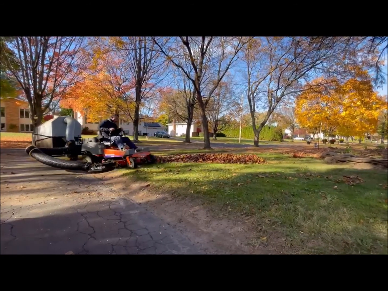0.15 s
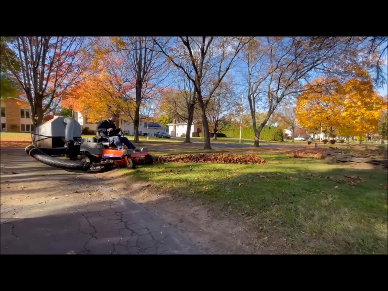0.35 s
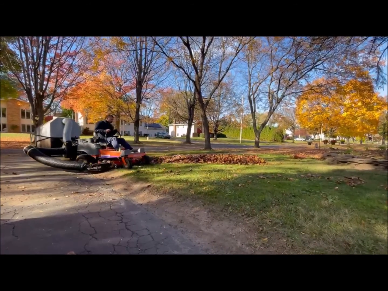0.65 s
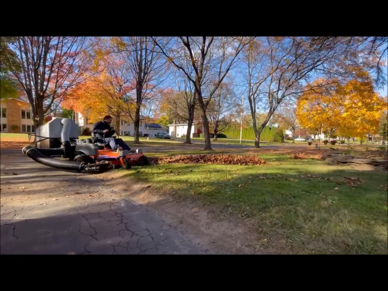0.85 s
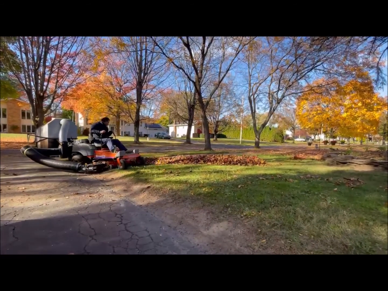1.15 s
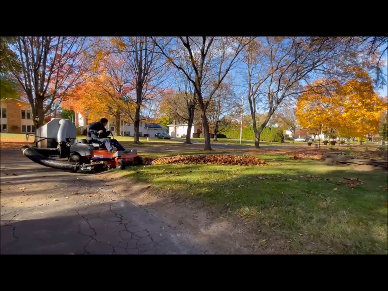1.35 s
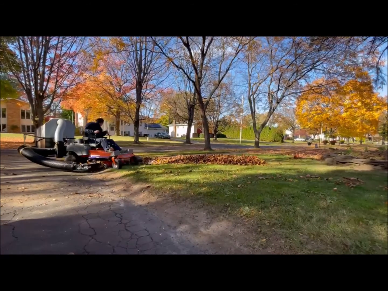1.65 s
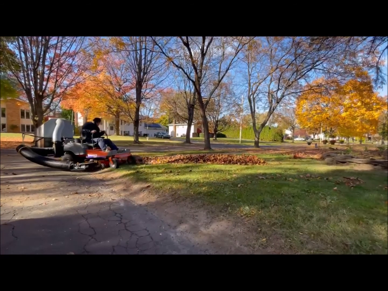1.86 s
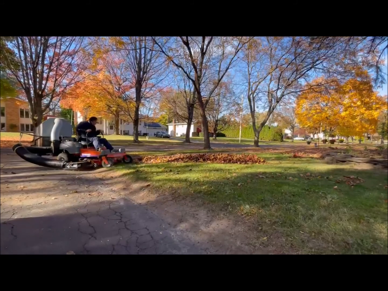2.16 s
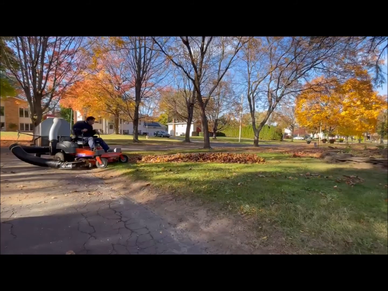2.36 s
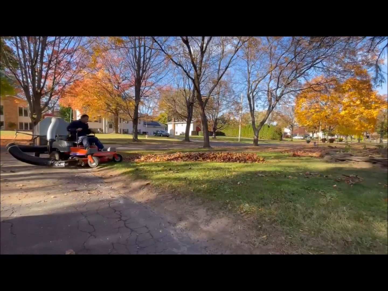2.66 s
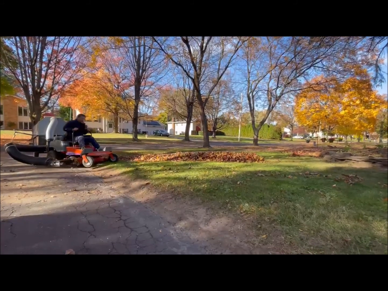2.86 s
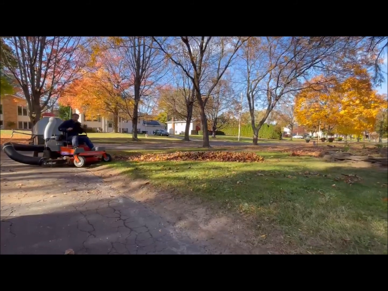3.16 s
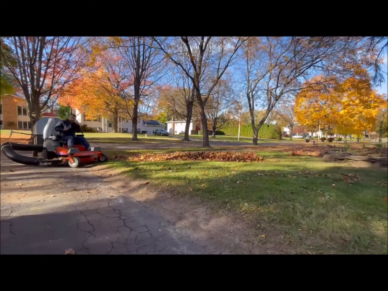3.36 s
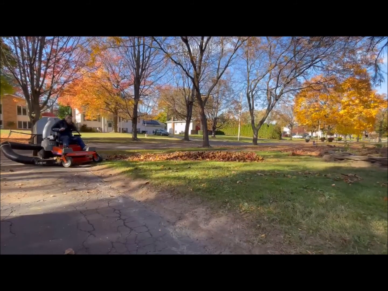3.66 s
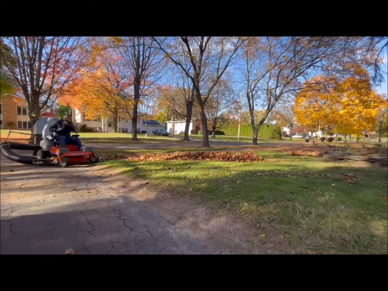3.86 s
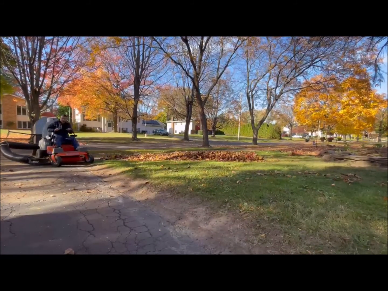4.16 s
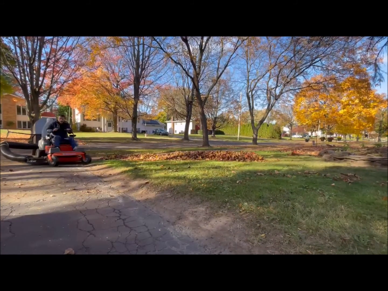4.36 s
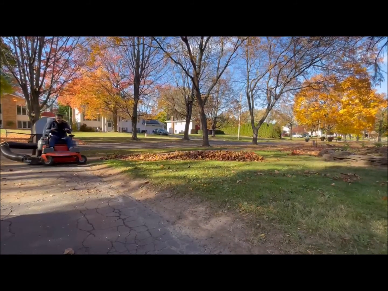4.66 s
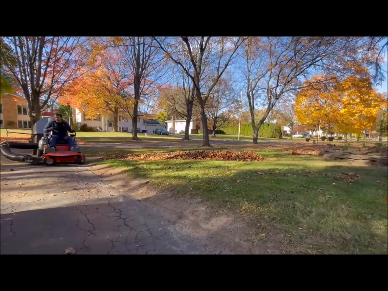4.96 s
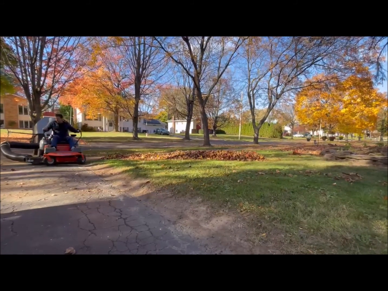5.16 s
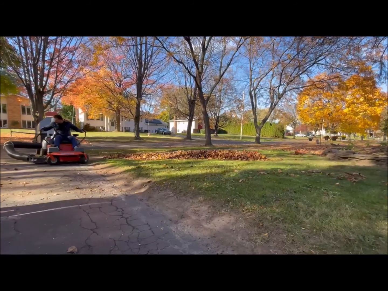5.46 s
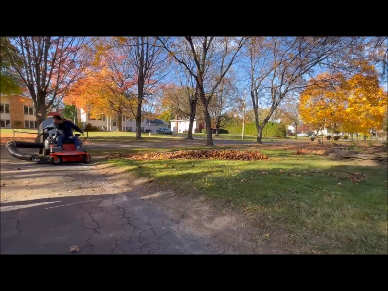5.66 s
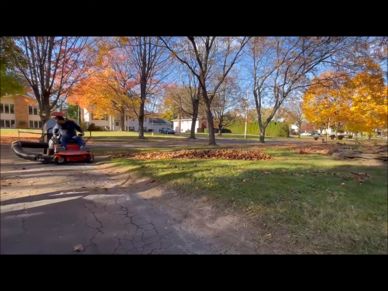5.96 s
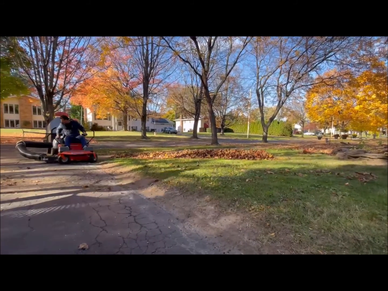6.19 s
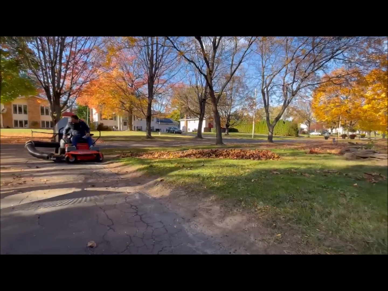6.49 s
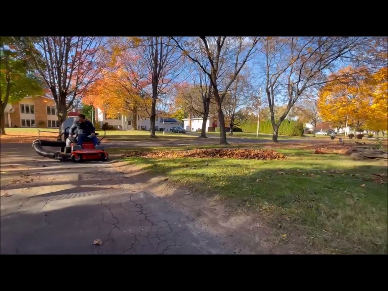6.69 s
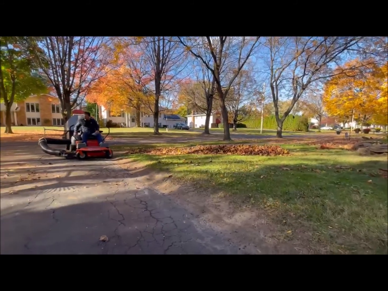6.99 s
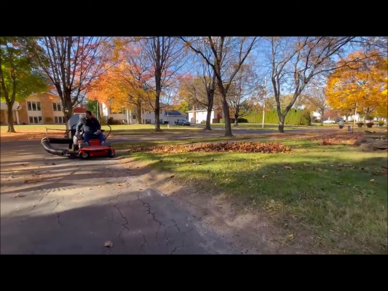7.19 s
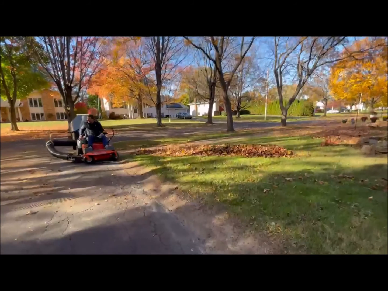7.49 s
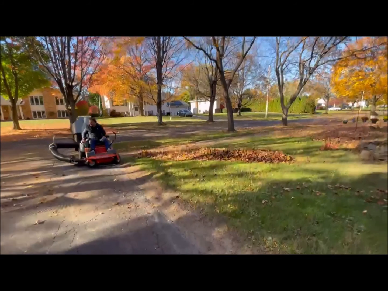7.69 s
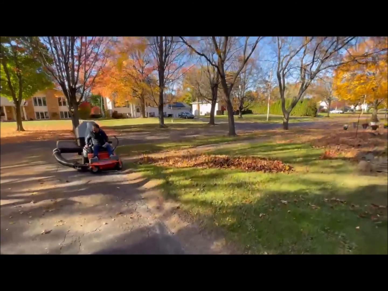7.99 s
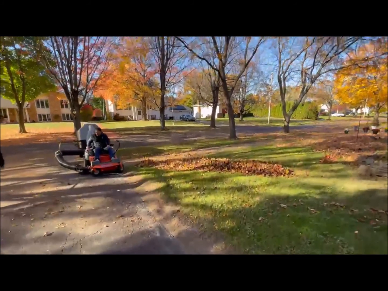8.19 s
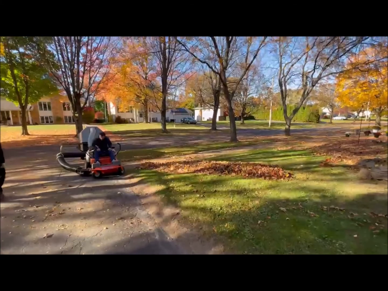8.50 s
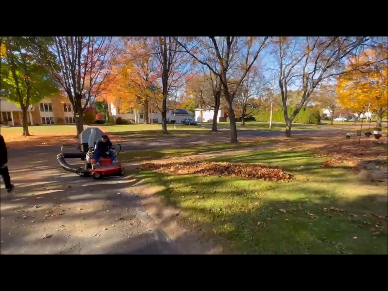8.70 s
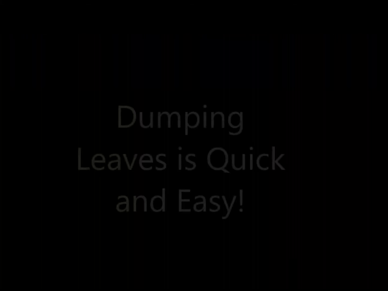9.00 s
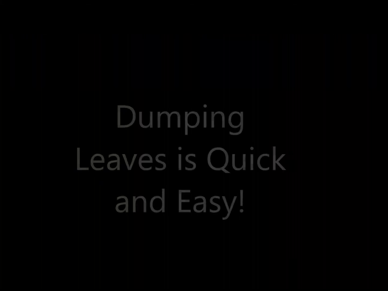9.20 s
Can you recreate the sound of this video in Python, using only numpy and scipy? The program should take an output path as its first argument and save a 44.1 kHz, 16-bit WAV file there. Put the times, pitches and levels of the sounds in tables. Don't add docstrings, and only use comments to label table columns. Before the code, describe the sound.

Dense, steady machine roar heard by a small stereo camera at a distance: whirring mower deck, two droning petrol engines and rushing suction air, with short brittle twig clicks. Late on, a rising screech marks the blades being released; their pitch falls, the mower engine slows and chuffs, wheels bump softly over a kerb, and the sound cuts off abruptly.

```python
import sys
import numpy as np
from scipy import signal
from scipy.fft import rfft, irfft, next_fast_len
from scipy.io import wavfile
from scipy.ndimage import uniform_filter1d

SR = 44100
rng = np.random.default_rng(int(sys.argv[2]) if len(sys.argv) > 2 else 0)


def inscribe(sig):
    pcm = np.round(np.clip(np.atleast_2d(sig).T, -1, 1) * 32767)
    wavfile.write(sys.argv[1], SR, pcm.astype(np.int16))


def voltage_ratio(decibels):
    exponent = np.asarray(decibels, float) / 20
    return 10 ** exponent


N = 411894
T = np.arange(N) / SR


def evened(x):
    return x / np.sqrt(np.mean(x ** 2) + 1e-20)


def curves(rows, t):
    s, *columns = np.transpose(rows)
    return [np.interp(t, s, c) for c in columns]


def read(points, hz):
    f, *columns = np.transpose(points)
    return np.array([np.interp(np.log(hz + 1), np.log(f + 1), c) for c in columns])


def drift(rate_hz):
    f = np.geomspace(rate_hz / 20, rate_hz, 16)[:, None]
    waves = np.sin(2 * np.pi * (f * T[::256] + rng.random((16, 1)))) / np.sqrt(f)
    return np.interp(T, T[::256], evened(waves.sum(0)))


def whistle(hz, width_hz):
    r = np.exp(-np.pi * width_hz / SR)
    noise = rng.standard_normal(N) + 1j * rng.standard_normal(N)
    slow = signal.lfilter([1], np.convolve([1, -r], [1, -r]), noise)
    turns = np.cumsum(hz + 0 * T) / SR
    return evened((slow * np.exp(2j * np.pi * turns)).real)


# (frequency [Hz], lead [half turns])
LEAD = [(0, 0), (870, .92), (1150, .42), (1320, 1.25), (1950, 1.15), (2300, 2), (2800, 2.1), (4000, 4.1),
        (4400, 4.85), (6460, 6.2), (8270, 6.7), (9730, 5), (10800, 4.97), (11700, 4)]


def ports(x):
    f, lead = np.transpose(LEAD)
    size = next_fast_len(N)
    lag = np.pi * np.interp(np.fft.rfftfreq(size, 1 / SR), f, lead)
    right = irfft(rfft(x, size) * np.exp(-1j * lag), size)[:N]
    return np.array([x, right])


def engine(run, orders, wobble_db, jitter):
    hz, level_db, dull_db = curves(run, T)
    turns = np.cumsum(hz * (1 + jitter * drift(5.87))) / SR
    tones = 0
    for k, db in orders:
        order_db = db - k * dull_db + wobble_db * np.sqrt(k) * drift(4)
        tones = tones + voltage_ratio(order_db) * np.cos(2 * np.pi * (k * turns + rng.random()))
    return np.sqrt(2) * voltage_ratio(level_db) * tones, turns


# (time [s], stage [0 side-on, 1 head-on, 2 turning past, 3 trailer swinging, 4 round])
HEADING = [
    (0, -0.5),
    (2.5, 1.2),
    (3.6, 0.77),
    (5.4, 1),
    (6.15, 1.75),
    (6.45, 2),
    (7.3, 2.5),
    (8, 4),
    (8.8, 4),
]
# (frequency [Hz], likeness [0-1])
SAME = [(100, .95), (900, .9), (1400, .86), (2100, .78), (2500, .55), (3000, .68), (4000, .5), (5000, .15),
        (6200, .35), (7800, .2), (8800, .72), (9650, .9), (9750, .999), (10400, .999), (11200, .6),
        (11800, .9)]


def air(spectrum, seen, patchy_db, flicker_db, lead, bands, stages, spread, dips=()):
    frames, hz = N // 256 + 5, np.fft.rfftfreq(1024, 1 / SR)[:, None]
    t = np.arange(frames) * 256 / SR
    a, b, c, d, patches = rng.standard_normal((frames, 513, 5)).T
    patches = evened(uniform_filter1d(uniform_filter1d(patches, 8, 0), 24, 1))
    gusts = evened(uniform_filter1d(rng.standard_normal(frames), 10)) * np.clip(hz / 8000, 0, 1.5)

    level_db, bright_db = curves(seen, t)
    tilt = np.clip(np.log2(hz / 1500 + 1e-9), 0, 1)
    field_db = level_db + bright_db * tilt + patchy_db * patches + flicker_db * gusts
    heading = curves(HEADING, t)[0]
    for first_hz, last_hz, *stage_db in bands:
        centre_hz = np.interp(heading, stages[::2], [first_hz, last_hz])
        db = np.interp(heading, stages, stage_db)
        field_db = field_db + db * np.exp(-(np.log(hz / centre_hz + 1e-9) / spread) ** 2)

    dip_db = np.zeros((2, 1, 1))
    for f, width_hz, left_db, right_db in dips:
        dip_db = dip_db + np.array([[[left_db]], [[right_db]]]) * np.exp(-((hz - f) / width_hz) ** 2)
    same = np.clip(read(SAME, hz)[0] * voltage_ratio(1.1 * np.minimum(dip_db, 0).sum(0)), 0, 1)
    lag = np.pi * np.interp(hz, *np.transpose(lead))
    left = a + 1j * b
    right = same * left * np.exp(-1j * lag) + np.sqrt(1 - same ** 2) * (c + 1j * d)
    z = np.array([left, right]) * voltage_ratio(read(spectrum, hz) + field_db + dip_db - 15)
    return np.sqrt(SR / 70) * signal.istft(z, nperseg=1024, noverlap=768)[1][:, :N]


# (time [s], blade passes per second [Hz])
BLADE_SPEED = [
    (0, 109.3),
    (1.4, 109.5),
    (2.05, 108.5),
    (2.7, 109.6),
    (4.1, 109.9),
    (4.7, 109),
    (5.4, 110.3),
    (6.3, 110.1),
]
RELEASE_S, SPIN_DOWN_PER_S = 6.3, .447


def blades():
    hz = curves(BLADE_SPEED, T)[0] * np.exp(-SPIN_DOWN_PER_S * np.maximum(T - RELEASE_S, 0))
    speed = hz / hz[0]
    audible = np.clip((speed - .6) / 0.026, 0, 1)
    return np.cumsum(hz) / SR, speed, audible


# (level [dB], fade [dB/s], time of a lull [s], between lulls [s], weaker blade's share [0-1])
BLADE_BEATS = [
    (-32, -0.05, 1.59, 6.33, 0.8),
    (-31, -1.35, 1.175, 2.83, 0.66),
    (-45.5, 0.17, 0.12, 4.9, 0.59),
]
THRUM_POWER, FREE_DB = 3.4, 3


def blade_thrum(turns, speed, audible):
    thrum, free = 0, np.clip((T - RELEASE_S) / .15, 0, 1)
    for k, (db, fade_db, lull_s, between_s, weaker) in enumerate(BLADE_BEATS):
        phase = 2 * np.pi * ((k + 1) * turns + rng.random())
        apart = np.pi * ((T - lull_s) / between_s + .5)
        pair = np.cos(phase + apart) + weaker * (1 - free) * np.cos(phase - apart)
        thrum = thrum + np.sqrt(2) * voltage_ratio(db + fade_db * T + FREE_DB * k * free) * pair
    return ports(audible * speed ** THRUM_POWER * thrum)


# (multiple of blade rate, level [dB])
BLADE_TOP = [(4, -45.5), (5, -47.5), (6, -41), (7, -62.5), (8, -39.5), (10, -46.5)]
# (frequency [Hz], width [Hz], level [dB])
DECK_RINGS = [(1105, 100, -39.5), (635, 67, -47.5), (877, 46, -51.5)]
# (time [s], level [dB], brightness above 3 kHz [dB])
DECK_SEEN = [(0, 1, 5), (1.999, 3.5, 1), (3, 3, -1), (3.6, 1.5, 0), (6.1, -0.06, -1), (6.5, 1, -4),
             (7.2, 0.4, -9.5), (8, -2.5, -4)]
# (frequency [Hz], left [dB per Hz], right [dB per Hz])
DECK_AIR = [(40, -71.5, -77.5), (132, -65, -55), (302, -70, -69), (650, -54, -61), (1070, -55.5, -61.5),
            (1292, -54, -54), (2254, -70, -65), (4470, -71, -73), (5430, -70, -88.5), (8000, -77.5, -85.5),
            (8450, -77.5, -78), (10180, -73.5, -77.5), (12260, -91.5, -91), (14500, -107, -107)]
# (first centre [Hz], last centre [Hz], level at stages 0, 1, 2 [dB])
DECK_BANDS = [(940, 1040, 3, 5, -2), (860, 900, 2, -10.5, -3.5), (2354, 2300, 0, 5, 0),
              (2706, 2800, -2, 5, 6.5), (430, 405, 9, -9, 6), (4140, 4250, -7.7, -1.9, -4),
              (1830, 1900, -2.5, -1, 1.5), (3250, 2820, -1, -1.5, -0.5)]
# (frequency [Hz], width [Hz], left [dB], right [dB])
PORT_DIPS = [(823, 40, -10, 9), (1044, 44, 1.5, -7.5), (1252, 81, -21, -5), (1600, 70, 0.5, -4.5),
             (1690, 99, 0, -3), (2517, 130, 1.5, -10.5), (3554, 610, 2, -4)]


def deck():
    turns, speed, audible = blades()
    hz = np.gradient(turns) * SR
    fuzz = sum(voltage_ratio(db) * whistle(k * hz, 1.42 * k) for k, db in BLADE_TOP)
    past = np.clip(curves(HEADING, T)[0] - 1, 0, 1)
    rings = 0
    for f, width_hz, db in DECK_RINGS:
        ring_db = db + 2.3 * drift(4) - 2.8 * past
        rings = rings + voltage_ratio(ring_db) * whistle(f * (1 + .007 * (T - 2)), width_hz)
    seen = voltage_ratio(curves(DECK_SEEN, T)[0])
    howl = ports(seen * (fuzz * speed ** 4 + rings * speed * (.15 + .85 * audible)))
    howl = howl * voltage_ratio([[1.5], [-3]])
    rush = air(DECK_AIR, DECK_SEEN, patchy_db=1.5, flicker_db=1.0, lead=LEAD, bands=DECK_BANDS,
               stages=range(3), spread=0.12, dips=PORT_DIPS)
    chop = 1 + .08 * np.cos(2 * np.pi * turns) + .04 * np.cos(4 * np.pi * turns)
    return blade_thrum(turns, speed, audible) + chop * (howl + speed ** 2.0 * rush)


# (time [s], firing rate [Hz], level [dB], dulling per multiple [dB])
VACUUM = [(0, 29.08, 4, 0.029), (4, 29.28, 0.2, .05), (5, 29.34, -0.8, 0.034), (7.5, 29.16, 3, 0.44),
          (8.8, 29.37, 3.5, 0.74)]
# (multiple of firing rate, level [dB])
VACUUM_ORDERS = [(1, -70), (2, -39.5), (3, -47.5), (4, -35.5), (5, -36.5), (6, -62.5), (7, -60), (8, -41.5),
                 (9, -48), (10, -62.5), (11, -47), (12, -55), (13, -64), (14, -60.5), (15, -54), (16, -50),
                 (17, -63), (18, -63), (19, -54), (20, -63), (21, -61), (22, -53.5), (23, -52.5), (24, -49)]
# (multiple of firing rate, level [dB])
FLYWHEEL = [(11, -45), (12, -55.5), (18, -59), (34, -58), (36, -58), (38, -55)]
FLYWHEEL_DB_PER_STAGE = 4.5
# (time [s], level [dB], brightness above 3 kHz [dB])
VACUUM_SEEN = [(0, -0.27, -1.5), (3, 0.88, 1.5), (6, 0.44, 3.3), (7.6, 1, 1.5), (8.8, -0.4, 3.5)]
# (frequency [Hz], left [dB per Hz], right [dB per Hz])
VACUUM_AIR = [(40, -74, -74.5), (95.7, -55.5, -56.5), (220, -59, -51.5), (496, -60.5, -71),
              (910, -57, -61.5), (1513, -66, -72.5), (2570, -79, -76.5), (4300, -86, -84.5),
              (5150, -78.5, -92), (6900, -82, -94), (8300, -91.5, -89), (10200, -81.5, -87.5),
              (11600, -94, -89), (12900, -121, -121)]
# (first centre [Hz], last centre [Hz], level at stages 2, 3, 4 [dB])
ECHO_BANDS = [(650, 670, 0, 6, -0.5), (445, 490, 5.5, 1, -9), (860, 1020, -4, -5, -7.5),
              (5470, 6800, 6.5, 2.5, 4)]
# (frequency [Hz], lead [half turns])
BROADSIDE_LEAD = [(0, 0), (340, .35), (540, .93), (1500, 1)] + LEAD[4:]


def vacuum():
    tones, turns = engine(VACUUM, VACUUM_ORDERS, wobble_db=0.31, jitter=0.0012)
    flywheel = sum(voltage_ratio(db) * np.cos(2 * np.pi * k * turns) for k, db in FLYWHEEL)
    bared = voltage_ratio(FLYWHEEL_DB_PER_STAGE * (curves(HEADING, T)[0] - 4)) * flywheel
    throb = 1 + .08 * np.cos(2 * np.pi * turns)
    rush = air(VACUUM_AIR, VACUUM_SEEN, patchy_db=2.1, flicker_db=0.5, lead=BROADSIDE_LEAD,
               bands=ECHO_BANDS, stages=range(2, 5), spread=0.15)
    return ports(tones + bared) + throb * rush


# (time [s], level [dB], silencer ring [Hz], upper ring [dB])
CHUFF = [
    (7.2, -56, 650, -12),
    (7.55, -43.5, 680, -12),
    (8.2, -41.5, 770, -15),
    (8.4, -40.5, 810, -5),
    (8.8, -41, 825, -5),
]
CHUFF_AT_S = 8.346


def exhaust(turns):
    db, hz, upper_db = curves(CHUFF, T)
    since = (turns - turns[round(CHUFF_AT_S * SR)]) % 1
    puff = uniform_filter1d(np.exp(-since / .3), 90)
    level = voltage_ratio(db) * (T > CHUFF[0][0])
    chuff = level * evened(puff) * whistle(hz, 270)
    upper = level * voltage_ratio(upper_db) * evened(puff + .5) * whistle(1350, 130)
    return np.array([chuff + upper, .55 * np.roll(chuff, 11)])


# (time [s], firing rate [Hz], level [dB], dulling per multiple [dB])
MOWER = [
    (0, 26.23, 2, .05),
    (4, 26.33, -1.5, .05),
    (6.1, 26.4, -3.3, .05),
    (6.5, 27.1, -3, .1),
    (7.3, 26.6, -2.3, .1),
    (7.55, 23.6, -1, .4),
    (7.91, 21.7, 0.5, .65),
    (8.53, 18.55, 0, .65),
    (8.8, 17.8, 0, .65),
]
# (multiple of firing rate, level [dB])
MOWER_ORDERS = [(1, -70.5), (2, -46.5), (3, -48), (4, -44.5), (5, -36), (6, -43), (7, -67), (8, -42),
                (9, -40), (10, -49), (11, -64.5), (12, -50), (13, -48), (14, -48), (15, -51), (16, -48.5),
                (17, -59.5), (18, -57), (19, -51), (20, -58), (21, -65.5), (22, -58.5), (23, -52.5),
                (24, -45)]


def mower():
    tones, turns = engine(MOWER, MOWER_ORDERS, wobble_db=1.07, jitter=.0015)
    return ports(tones) + exhaust(turns)


# (time [s], centre frequency [Hz], level [dB])
SWEEP = [
    (5.95, 1800, -60),
    (6.1, 2200, -49),
    (6.2, 2800, -45),
    (6.3, 3800, -44),
    (6.38, 5000, -45),
    (6.46, 5600, -50),
    (6.6, 5800, -70),
]


def sweep():
    hz, db = curves(SWEEP, T)
    ridges = 1.25 * whistle(hz, 1500) + voltage_ratio(-2) * whistle(np.minimum(2 * hz, 8600), 2000)
    sweeping = (T > SWEEP[0][0]) * (T < SWEEP[-1][0])
    return voltage_ratio(db) * ridges * sweeping * voltage_ratio([[0], [-8]])


# (time [s], peak [dB], frequency [Hz], left minus right [dB])
TWIGS = [(0.6185, -22.5, 5070, 11), (1.7194, -19.5, 7000, 3), (2.2074, -22.5, 5835, 3.5),
         (2.5094, -25, 5276, 11), (2.8994, -43, 6070, 3), (3.5494, -25, 6220, 7.5),
         (3.6594, -29.5, 5160, -1), (3.692, -21, 8800, 1), (5.6142, -24.5, 5170, 7), (5.7533, -26, 5520, 2),
         (6.6994, -29, 5500, -2), (6.9616, -38, 6360, -1), (7.0758, -46, 6440, 2), (7.2195, -38, 5370, 1),
         (8.3464, -43, 5854, -0.5)]


def twigs():
    out, t = np.zeros((2, N)), np.arange(900) / SR
    envelope = np.minimum(t / 0.00076, 1) * voltage_ratio(-60 * t / 0.055)
    for s, db, hz, pan_db in TWIGS:
        band = signal.butter(2, [hz * .65, min(hz * 1.45, 11000)], "bandpass", fs=SR, output="sos")
        crunch = evened(signal.sosfilt(band, rng.standard_normal(len(t)))) * envelope
        at = round(s * SR)
        out[:, at:at + len(t)] += voltage_ratio(db - 8.5 + np.array([[pan_db], [-pan_db - 4]]) / 2) * crunch
    return np.array([out[0], ports(out[1])[1]])


# (time [s], level [dB])
RUMBLE = [
    (6.3, -64),
    (7.35, -31),
    (7.7, -30.5),
    (7.95, -40),
    (8.8, -34.5),
]


def wheels():
    rumble = voltage_ratio(curves(RUMBLE, T)[0] + 2 * drift(12)) * whistle(140, 190)
    return ports(signal.sosfilt(signal.butter(2, 380, fs=SR, output="sos"), rumble))


def scene():
    return deck() + vacuum() + mower() + sweep() + twigs() + wheels()


# (frequency [Hz], favour [dB])
FAVOURED = [(10500, -4), (11500, 1), (12300, 1), (13200, -5), (14000, 0), (14900, 8), (15700, 4)]
# (time [s], margin [dB])
SLACK = [(0, 8.5), (2.4, 7), (3.1, 0), (5.9, 0), (6.2, -5), (6.8, 3), (7.15, -1), (7.3, 7), (8.8, 4.5)]


def thin_top(x):
    mid_side = np.array([x[0] + x[1], x[0] - x[1]]) / 2
    hz, t, z = signal.stft(mid_side, SR, nperseg=1882)
    power, band = abs(z) ** 2, np.minimum(np.arange(len(hz)) // 20, 46)
    band_power = np.array([power[:, band == k].mean(1) for k in range(band[-1] + 1)])
    band_db = 10 * np.log10(band_power + 1e-20)
    usual_db = uniform_filter1d(band_db[24, 0], 41)
    chance = evened(uniform_filter1d(rng.standard_normal(len(t)), 2))
    chance = chance + .7 * rng.standard_normal(band_db.shape)
    favour_db = np.interp(hz[10::20], *np.transpose(FAVOURED))[:len(band_db), None, None]
    kept = band_db > usual_db - curves(SLACK, t)[0] - 2 - favour_db + 4.5 * chance
    mask = kept[band].transpose(1, 0, 2) | (hz < 9700)[:, None]
    mid, side = signal.istft(z * mask, SR, nperseg=1882)[1][:, :N]
    return np.array([mid + side, mid - side])


def low_pass(x):
    return signal.sosfilt(signal.butter(12, 15720, fs=SR, output="sos"), x)


CUT_S = 8.7688


def record(dry):
    heard = signal.sosfilt(signal.butter(3, 46, "highpass", fs=SR, output="sos"), dry)
    heard = thin_top(heard)
    return low_pass(heard * (T < CUT_S))


dry = scene()
out = record(dry)
inscribe(out)
```